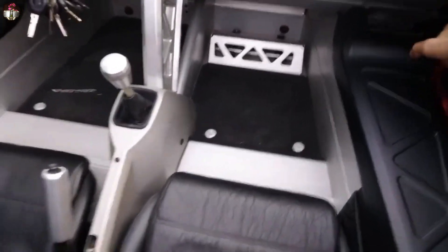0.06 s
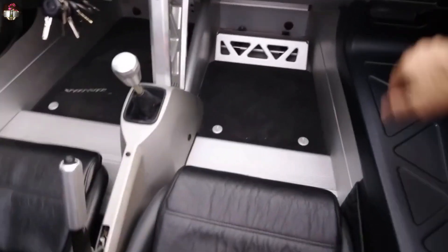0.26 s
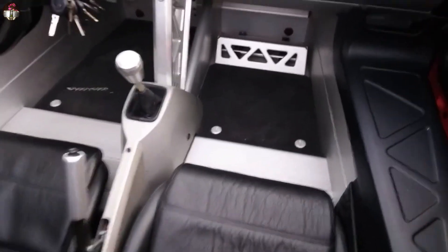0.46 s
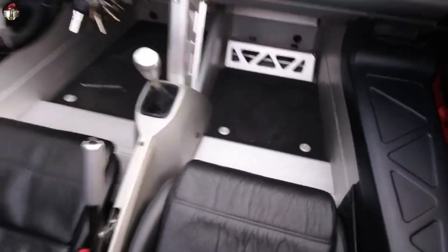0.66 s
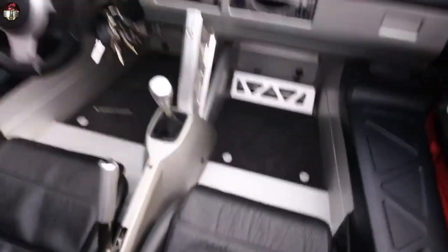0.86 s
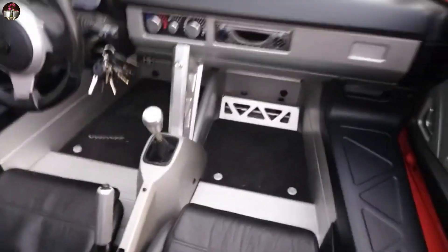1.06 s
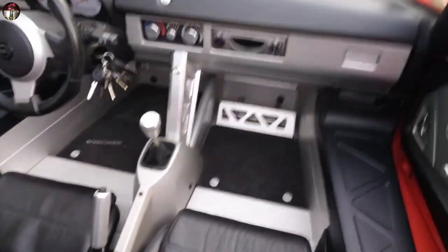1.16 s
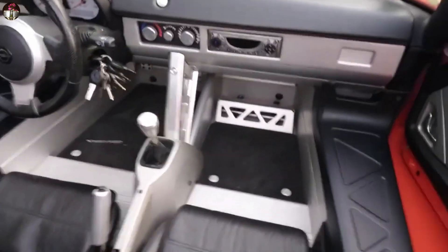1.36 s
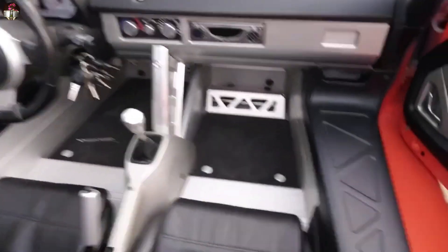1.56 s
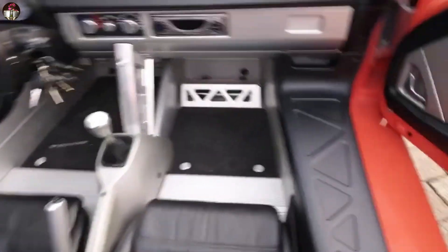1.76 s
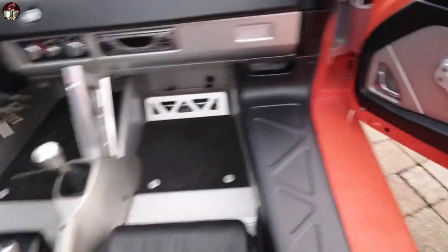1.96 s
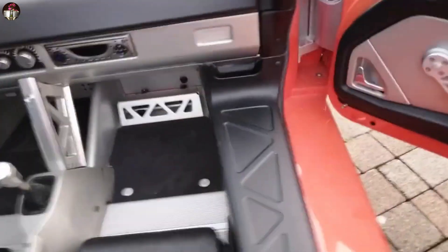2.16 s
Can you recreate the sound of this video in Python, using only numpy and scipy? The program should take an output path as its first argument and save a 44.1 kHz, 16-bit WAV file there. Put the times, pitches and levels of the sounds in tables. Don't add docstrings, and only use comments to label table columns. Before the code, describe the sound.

A car window crank bangs loudly, then the glass judders and rasps in its rubber channel.

```python
import sys
import numpy as np
from scipy import signal
from scipy.fft import rfft, irfft
from scipy.io import wavfile
from scipy.ndimage import uniform_filter1d

SR = 44100
rng = np.random.default_rng(int(sys.argv[2]) if len(sys.argv) > 2 else 0)


def amplitude_ratio(level_db):
    exponent = np.asarray(level_db, float) / 20
    return 10 ** exponent


def master_out(mix):
    frames = np.transpose(np.atleast_2d(mix))
    ceiling = np.clip(frames, -1, 1)
    pcm = np.round(ceiling * 32767).astype(np.int16)
    wavfile.write(sys.argv[1], SR, pcm)


N = 97020
T = np.arange(N) / SR

# frequency_hz, level_db
AIR_SPECTRUM = [(15, -55), (25, 4), (167, -12), (1090, -39), (1830, -23.5), (4020, -22), (10400, -34.5),
                (15200, -29), (16500, -64)]
# start_s, boom_db
PANEL_LOAD = [(0, -48), (.2, -41), (.3, -41), (.45, -51), (.7, -64), (.8, -49.5), (.97, -58), (1.03, -46.5),
              (1.15, -38.5), (1.37, -36.5), (1.44, -43), (1.49, -43.5), (1.6, -43), (1.69, -39),
              (1.78, -49.5), (1.88, -37.5), (1.99, -41), (2.05, -55.5)]
# frequency_hz, level_db, t60_s
PANEL_MODES = [(58.7, 3.5, 0.41), (117.4, -8, 0.23), (133.2, 4, 0.31), (159.6, 3.5, 0.14),
               (211, -1.5, 0.11), (290, -29, 0.066)]
# start_s, rasp_db, swish_db (relative to the rasp)
SLIDE = [(.062, -65, -17), (.07, -40, 2.5), (.11, -38, -7.5), (.135, -48.5, -46), (.2, -34.5, -19),
         (.3, -47.5, -12), (.7, -51.5, -0.5), (.79, -41.5, -20), (.86, -36, -14), (.92, -51.5, 9),
         (1.0, -63, 6.5), (1.8, -59, -49), (1.85, -34.5, -16.5), (1.95, -39.5, -42), (2.09, -45, -17),
         (2.135, -33, -22.5), (2.175, -40, -17), (2.2, -55, -15)]
# frequency_hz, level_db
RASP_SPECTRUM = [(250, 6), (500, -4), (800, -9.5), (1870, -8.5), (3300, -14), (4500, -19), (7000, -74),
                 (16000, -111)]
# frequency_hz, level_db
SWISH_SPECTRUM = [(2500, -1.5), (4500, 1), (6600, -7), (8500, -9), (11000, -7.5), (16000, -13)]
# start_s, pitch_hz, squeal_db, whisper_db
SQUEAL = [
    (1.82, 4400, -72, -87),
    (1.85, 4260, -53, -68),
    (1.9, 4270, -46, -59),
    (1.95, 4250, -48.5, -60),
    (2.0, 4090, -49, -56.5),
    (2.05, 3900, -56, -53),
    (2.1, 3660, -56, -51.5),
    (2.13, 3700, -56, -57.5),
    (2.2, 3820, -75, -52.5),
]
# start_s, slip_rate_hz, level_db
JUDDER = [
    (1.146, 186, -40.5),
    (1.16, 198, -45.5),
    (1.2, 200, -43),
    (1.25, 165, -44),
    (1.28, 150, -42),
    (1.3, 150, -40),
    (1.325, 204, -42),
    (1.342, 182, -48),
]
# start_s, peak_db
SINGLE_SLIPS = [(1.048, -35), (1.0558, -36), (1.0648, -32.5), (1.0717, -32.5), (1.0765, -35), (1.0814, -33),
                (1.0864, -27.5), (1.0914, -40), (1.0964, -30.5), (1.1031, -26), (1.1112, -31.5),
                (1.1195, -31), (1.1283, -34), (1.1359, -30), (1.1434, -28), (1.3438, -28), (1.3514, -31.5),
                (1.361, -37.5), (1.3687, -31.5), (1.3779, -33.5), (1.3924, -29), (1.4072, -32),
                (1.4172, -29), (1.4244, -29.5), (1.4314, -32), (1.4384, -30.5), (1.4444, -33.5),
                (1.4514, -52), (1.4588, -34.5), (1.4638, -45), (1.509, -30), (1.5181, -34.5),
                (1.5622, -28.5), (1.5735, -27.5), (1.583, -39), (1.5867, -39), (1.5974, -37), (1.6047, -37),
                (1.616, -32.5), (1.6267, -34), (1.6322, -30), (1.6396, -31), (1.6434, -37), (1.6523, -30.5),
                (1.7225, -49), (1.7389, -52), (1.7577, -43.5), (1.8119, -36.5)]
# frequency_hz, level_db
RUBBER_SPECTRUM = [(200, -15), (350, 5), (650, -3), (1150, -3), (3000, -8.5), (4800, -17), (7000, -27.5),
                   (16000, -46.5)]
# frequency_hz, level_db, t60_s
GLASS_MODES = [(432, 8.5, 0.088), (594, 8, 0.022), (1520, 2, 0.012), (2730, -10, 0.0029),
               (3460, -29, 0.0053), (4360, -12, 0.0058)]
# start_s, crack_db, thud_db, clack_db, t60_s
KNOCKS = [(0.0685, -47, -42.5, -40, 0.24), (.098, -33, -27, -49, 0.076), (0.108, -65, -40, -36.5, 0.13),
          (0.163, -70, -67, -44.5, 0.035), (0.2065, -28, -24, -31, 0.042), (0.2092, -18, -19, -18.5, 0.18),
          (0.2168, -8, -11, -21, 0.029), (0.226, -16, -16, -14, 0.051), (0.233, -35.5, -31.5, -49, 0.17),
          (0.439, -48, -43, -52, 0.21), (0.728, -45, -38, -61, 0.12), (0.7445, -29.5, -36.5, -40, 0.073),
          (0.758, -31.5, -31.5, -40.5, 0.1), (.808, -65, -39, -41, 0.044),
          (0.8461, -43.5, -44.5, -52, 0.11), (1.8954, -57, -28.5, -30.5, 0.025),
          (1.921, -49, -24.5, -37, 0.073), (2.095, -60, -39.5, -44.5, 0.044),
          (2.116, -41.5, -55, -47, 0.067), (2.133, -41, -30.5, -59, 0.16)]
# frequency_hz, level_db
CRACK_SPECTRUM = [(600, -21), (950, 4.5), (1800, -0.5), (2700, -5.5), (5700, -9.5), (7600, -22),
                  (10200, -23.5), (16000, -54)]
# frequency_hz, level_db, t60_s
CLACK_MODES = [(327, -2, 0.017), (360.4, 15, 0.034), (439.6, 2.5, 0.088), (500, 7, 0.03), (550, -16, 0.064),
               (760, -20, 0.0063)]
# start_s, level_db
TICKS = [
    (0.066, -22),
    (0.2137, -12),
    (.227, -19),
    (0.241, -15),
    (0.604, -32),
    (0.7425, -18.5),
    (1.8335, -38.5),
]
# frequency_hz, level_db
TICK_SPECTRUM = [(1500, -3), (5000, -6.5), (7000, -10.5), (11000, -22), (16000, -22)]
# frequency_hz, level_db
MIC_RESPONSE = [(7000, -0.5), (8500, -4), (10300, -2), (12000, -9), (15700, -8), (16400, -60)]
# frequency_hz, left_minus_right_db
PORT_BALANCE = [(60, 2.5), (200, 0.5), (700, 1), (2400, 5.5), (4400, 5), (7000, 7.5), (10000, -12.5),
                (15000, 2.5)]

AIR_DB, WAKE_S, ASLEEP_DB = -54, 0.064, -29
RUMBLE_DB, RUMBLE_HZ = -48.5, 65
SHARED_HZ, DIRECT_DB = 700, -7
NEAR_T60_S, NEAR_DB, HAND_DRIFT_HZ = 0.003, 0, 9
EARLY_T60_S, EARLY_DB = 0.024, 1.5
CABIN_T60_S, CABIN_DB, CABIN_DULL_HZ = 0.08, 0.5, 3200
RIGHT_LAG_S = 0.00046
GRIT_DB = 1
SQUEAL_WIDTH_HZ, WHISPER_HZ, WHISPER_WIDTH_HZ = 350, 6100, 2500
SLIP_JITTER, SLIP_SCATTER_DB, SLIP_T60_S = 0.02, 1.2, 0.0071
CONTACT_DRIFT_HZ, SNAP, FRESH = 12, 5, 0.4
SLIPS_DB, GLASS_DB = -1.5, -5.5
TICK_T60_S = 0.026
KICK = 9
PUSH_S, PANEL_TOP_HZ = 0.0061, 620


def unit(x):
    return x / np.sqrt(np.mean(x ** 2))


def lowpass(x, hz, order):
    return signal.lfilter(*signal.butter(order, 2 * hz / SR), x)


def highpass(x, hz):
    return signal.lfilter(*signal.butter(2, 2 * hz / SR, "high"), x)


def colour(x, spectrum):
    hz, db = np.array(spectrum).T
    f = np.maximum(np.fft.rfftfreq(4096, 1 / SR), 1)
    log_gain = np.interp(np.log(f), np.log(hz), db) * np.log(10) / 20
    cepstrum = irfft(log_gain)
    cepstrum[1:2048] *= 2
    cepstrum[2049:] = 0
    return signal.fftconvolve(x, irfft(np.exp(rfft(cepstrum))))[:N]


def ring(x, modes):
    out, power = 0, 0
    for hz, db, t60 in modes:
        radius = np.exp(-np.log(1000) / (t60 * SR))
        poles = [1, -2 * radius * np.cos(2 * np.pi * hz / SR), radius * radius]
        out = out + amplitude_ratio(db) * np.sqrt(1 - radius) * signal.lfilter([1, 0, -1], poles, x)
        power += amplitude_ratio(db) ** 2
    return out / np.sqrt(power)


def walk(rate):
    k = int(SR / rate)
    return unit(uniform_filter1d(uniform_filter1d(rng.standard_normal(N), k), k))


def shared_walks(count, rate):
    weights = np.array([walk(rate) for _ in range(count)])
    return weights / np.sqrt(np.sum(weights ** 2, axis=0))


def curve(table, column):
    points = np.array(table)
    return np.interp(T, points[:, 0], points[:, column])


def burst(start, t60):
    return np.where(T >= start, np.exp(-np.log(1000) * np.maximum(T - start, 0) / t60), 0)


def narrow(hz, width):
    band = lowpass(rng.standard_normal(N), width / 2, 2)
    return unit(band) * np.sin(2 * np.pi * np.cumsum(hz + 0 * T) / SR)


def outdoor_air():
    noise = np.array([colour(rng.standard_normal(N), AIR_SPECTRUM) for _ in range(2)])
    return unit(noise) * amplitude_ratio(AIR_DB - 3.0 + 0.5 * walk(18) + ASLEEP_DB * (T < WAKE_S))


def rumble():
    low = highpass(lowpass(rng.standard_normal((2, N)), RUMBLE_HZ, 2), 25)
    ports = low[0] + 0.67 * low[1] * np.array([[1], [-1]])
    return amplitude_ratio(RUMBLE_DB + walk(15)) * unit(ports)


def panel_hum():
    hum = unit(ring(rng.standard_normal(N), PANEL_MODES[1:5]))
    return hum * amplitude_ratio(curve(PANEL_LOAD, 1) - 2.5 * walk(21.5))


def reflections(x, t60):
    h = rfft(rng.standard_normal((2, 8192)) * burst(0, t60)[:8192])
    h = irfft(h / uniform_filter1d(np.abs(h), size=60))[:, :6000]
    return np.array([signal.fftconvolve(x, response)[:N] for response in h])


def cabin(x):
    dull = lowpass(x, CABIN_DULL_HZ, 1)
    low = lowpass(x, SHARED_HZ, 1)
    high = x - low
    scatter = sum(reflections(w * high, NEAR_T60_S) for w in shared_walks(4, HAND_DRIFT_HZ))
    near = low + amplitude_ratio(DIRECT_DB) * high + amplitude_ratio(NEAR_DB) * scatter
    late = amplitude_ratio(CABIN_DB) * reflections(highpass(dull, 350), CABIN_T60_S)
    early = amplitude_ratio(EARLY_DB) * reflections(x - dull, EARLY_T60_S)
    return near + late + early


def slide():
    roughness = amplitude_ratio(GRIT_DB * rng.exponential(size=N) / 2 + 2 * walk(38))
    grit = rng.standard_normal((2, N)) * roughness
    rasp = unit(colour(grit[0], RASP_SPECTRUM))
    swish = amplitude_ratio(curve(SLIDE, 2)) * unit(colour(grit[1], SWISH_SPECTRUM))
    squeal = narrow(curve(SQUEAL, 1), SQUEAL_WIDTH_HZ) * amplitude_ratio(curve(SQUEAL, 2))
    whisper = narrow(WHISPER_HZ, WHISPER_WIDTH_HZ) * amplitude_ratio(curve(SQUEAL, 3))
    return amplitude_ratio(curve(SLIDE, 1)) * (rasp + swish) + squeal + whisper


def slip_impulses():
    first, last = JUDDER[0][0], JUDDER[-1][0]
    rate = (T > first) * curve(JUDDER, 1) * (1 + SLIP_JITTER * walk(150))
    phase = np.cumsum(rate) / SR
    released = np.diff(np.floor(phase), prepend=0) > 0
    slips = released * amplitude_ratio(curve(JUDDER, 2) + 8.5 + SLIP_SCATTER_DB * walk(320))
    slips[(T < first) | (T > last)] = 0
    for start, db in SINGLE_SLIPS:
        slips[int(start * SR)] += amplitude_ratio(db + SLIPS_DB)
    return slips


def judder():
    slips = slip_impulses()
    fade = burst(0, SLIP_T60_S)[:600]
    shapes = rng.standard_normal((5, 600)) * fade
    weights = shared_walks(5, CONTACT_DRIFT_HZ)
    grain = sum(signal.fftconvolve(slips * w, h)[:N] for w, h in zip(weights, shapes))
    grain += FRESH * rng.standard_normal(N) * signal.fftconvolve(slips, fade)[:N]
    snap = SNAP * lowpass(slips, 900, 1) + grain - lowpass(grain, 900, 1)
    rubber = colour(snap, RUBBER_SPECTRUM) / np.std(colour(rng.standard_normal(N), RUBBER_SPECTRUM))
    return 2 * (rubber + amplitude_ratio(GLASS_DB) * ring(snap, GLASS_MODES))


def knock_envelope(column, shortening):
    return sum(amplitude_ratio(k[column]) * burst(k[0], k[4] * shortening) for k in KNOCKS)


def kick(envelope):
    return KICK * np.maximum(np.diff(envelope, prepend=0), 0)


def metal_ticks(noise):
    envelope = sum(amplitude_ratio(db) * burst(start, TICK_T60_S) for start, db in TICKS)
    return 2 * colour(noise * envelope, TICK_SPECTRUM)


def knocks():
    noise = highpass(rng.standard_normal((4, N)), 70)
    crack_env, clack_env, thud_env = knock_envelope(1, 0.78), knock_envelope(3, 0.88), knock_envelope(2, 1.0)
    crack = colour(noise[0] * crack_env, CRACK_SPECTRUM) / np.std(colour(noise[0], CRACK_SPECTRUM))
    clack = lowpass(ring(0.5 * noise[1] * clack_env + kick(clack_env), CLACK_MODES), 1100, 2)
    push = 1 / (PUSH_S * SR)
    late = signal.lfilter([push], [1, push - 1], thud_env)
    thud = 2.2 * ring(0.5 * noise[2] * late - kick(thud_env), PANEL_MODES)
    return crack + metal_ticks(noise[3]) + 3 * clack, lowpass(thud, PANEL_TOP_HZ, 2)


def scene():
    air, thud = knocks()
    airborne = cabin(air) + amplitude_ratio(-0.27) * cabin(judder()) + cabin(slide())
    door = airborne * amplitude_ratio(-4.5) + thud + panel_hum() + rumble()
    door[1] = np.roll(door[1], int(RIGHT_LAG_S * SR))
    return door + outdoor_air()


def low_pass(x):
    return signal.sosfilt(signal.butter(12, 17000, fs=SR, output="sos"), x)


def record(dry):
    hz, db = np.array(PORT_BALANCE).T
    tilt = np.interp(np.log(np.fft.rfftfreq(N, 1 / SR) + 1), np.log(hz), db) / 2
    ports = []
    for x, side in zip(dry, (1, -1)):
        ports.append(irfft(rfft(colour(x, MIC_RESPONSE)) * amplitude_ratio(side * tilt), N))
    mix = 1.518 * np.tanh(np.array(ports) / 1.494)
    return low_pass(mix)


dry = scene()
out = record(dry)
master_out(out)
```